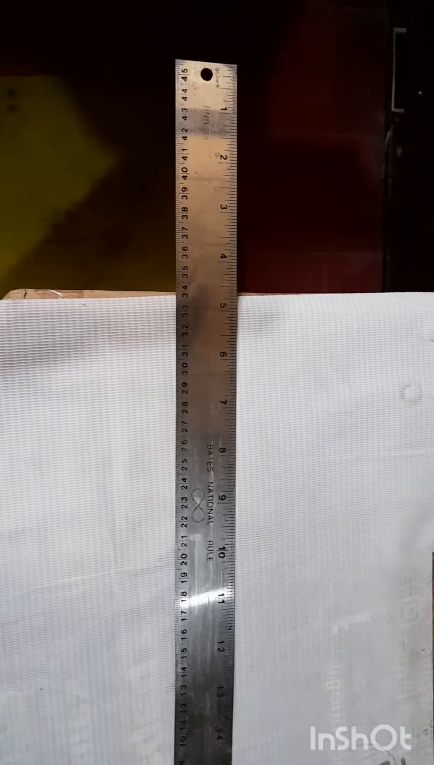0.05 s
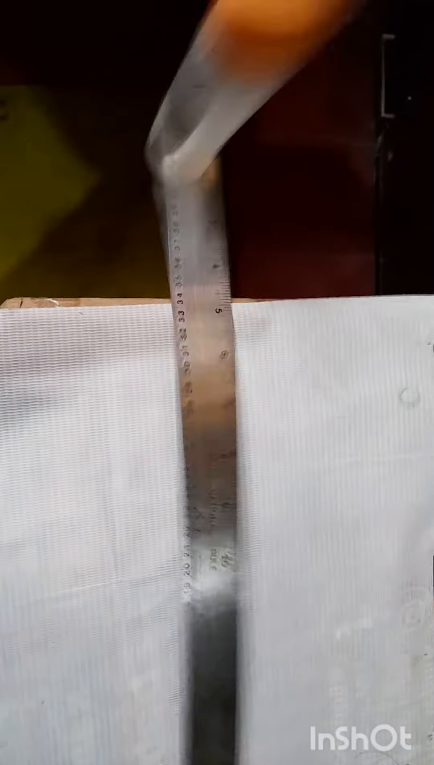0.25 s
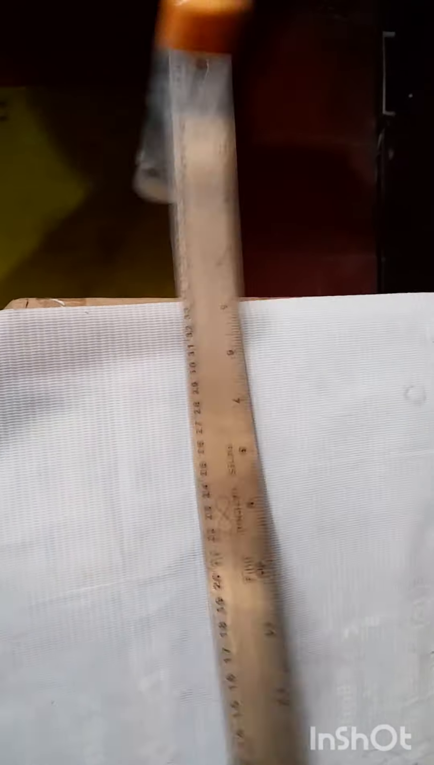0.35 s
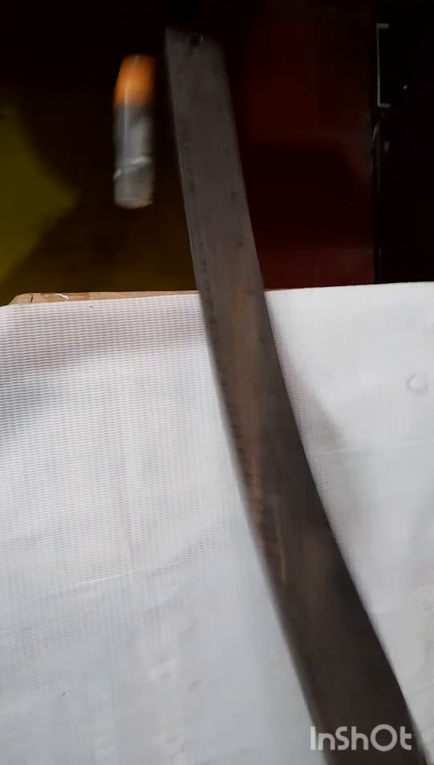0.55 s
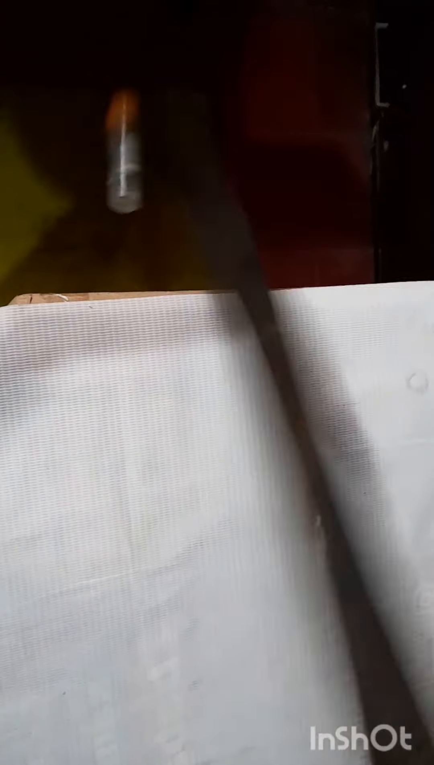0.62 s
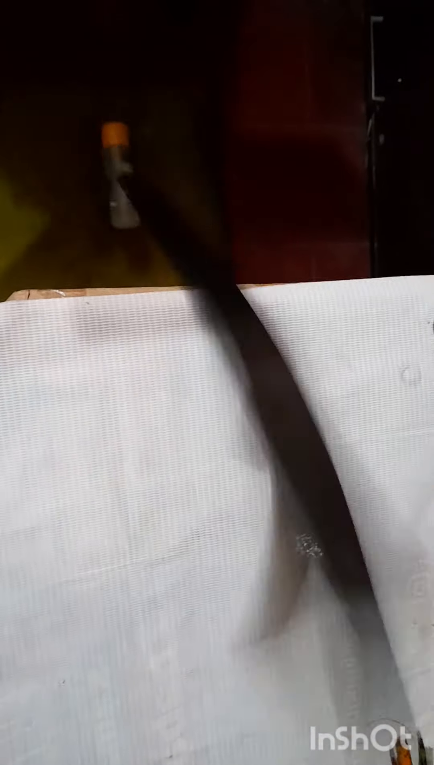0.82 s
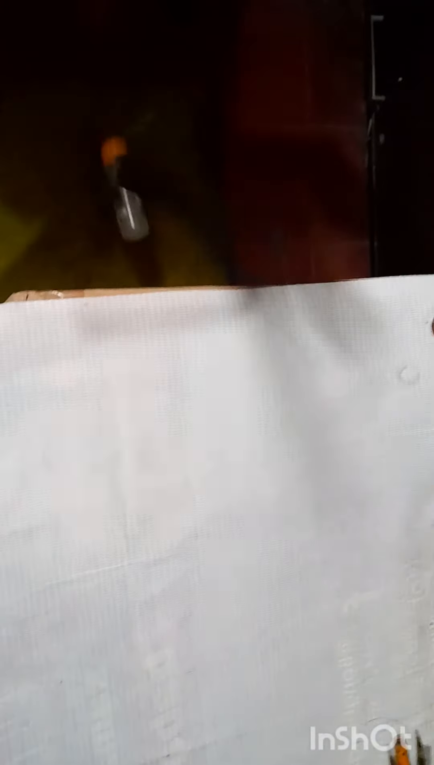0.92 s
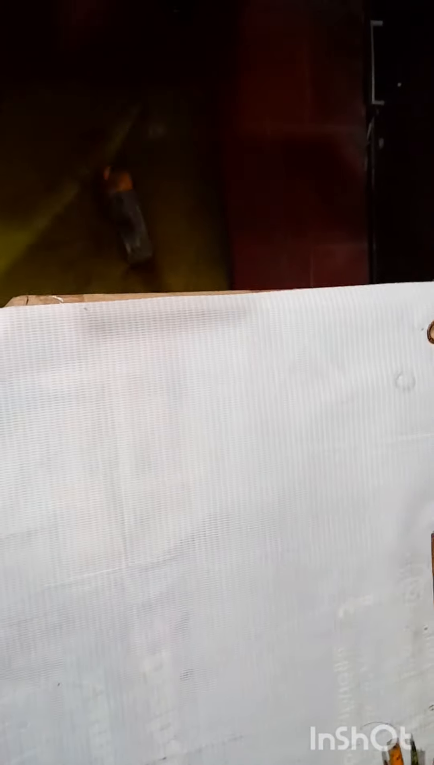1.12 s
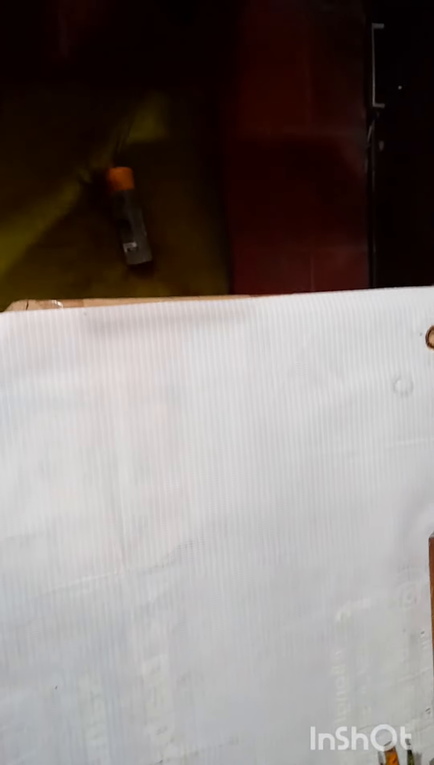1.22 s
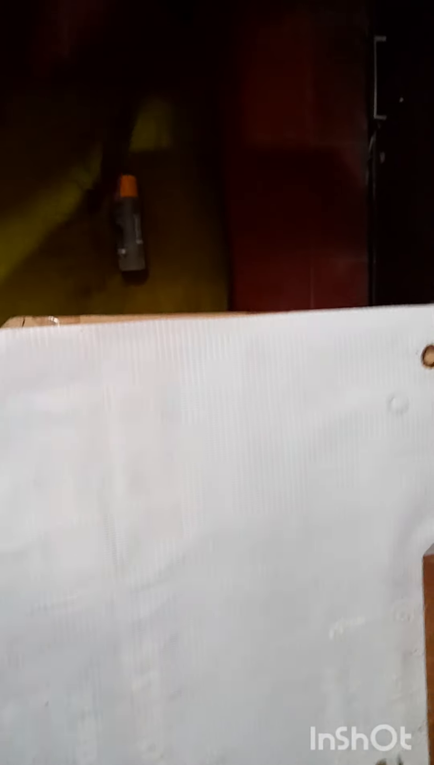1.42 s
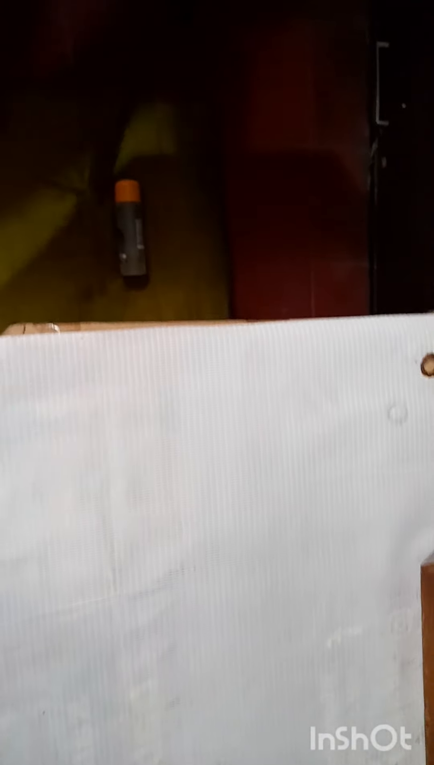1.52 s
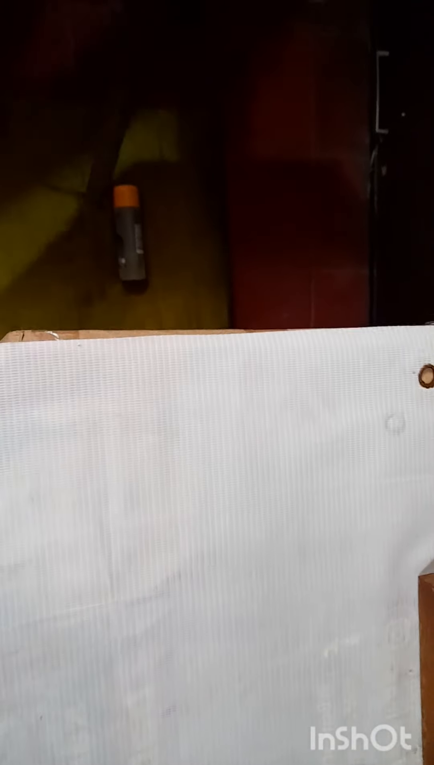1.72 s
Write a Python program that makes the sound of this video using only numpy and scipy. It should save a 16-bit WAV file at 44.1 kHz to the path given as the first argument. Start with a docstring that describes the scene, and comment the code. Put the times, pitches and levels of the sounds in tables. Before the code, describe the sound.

A steel ruler slaps a tabletop and buzzes briefly, then knocks against the microphone with a wavering ring. It clatters on the table edge, drops with two clacks and settles in a light rattle in a small room.

```python
"""A steel ruler overhanging a table, struck with a small tube, slaps the top, buzzes and flips.
It knocks against the microphone's case and rings, wavering as it bends, then clatters on the
table edge and drops off. Two clacks, dull bumps and a skittering rattle follow as things settle
on the floor of a small room. Hits are bursts of shaped noise plus the dying modes of what was hit."""
import sys
import numpy as np
from scipy import signal
from scipy.fft import rfft, irfft
from scipy.io import wavfile

SR = 44100
rng = np.random.default_rng(int(sys.argv[2]) if len(sys.argv) > 2 else 0)


def generate_wav(signal):
    """Clip the signal to [-1, 1] and save it as 16-bit WAV at the path in sys.argv[1]."""
    frames = np.transpose(np.atleast_2d(signal))
    scaled = np.clip(frames, -1, 1) * 32767
    pcm = np.round(scaled).astype(np.int16)
    wavfile.write(sys.argv[1], SR, pcm)


N = 77175
T = np.arange(N) / SR
TAIL = 16384  # longest ring or reverb, in samples


def amp(db):
    """Decibels to gain."""
    return 10 ** (np.asarray(db) / 20)


def curve_at(points, hz):
    """Reads a curve on a log-frequency axis."""
    freqs, values = np.transpose(points)
    return np.interp(np.log(hz + 1), np.log(freqs), values)


def unit_rms(x):
    """Scales to rms 1."""
    return x / np.sqrt(np.mean(x ** 2) + 1e-20)


def pan(left_db):
    """Left and right gains for a level difference."""
    return amp([[left_db / 2], [-left_db / 2]])


def fader(times_s, levels_db):
    """A level ride, silent outside its points."""
    return amp(np.interp(T, times_s, levels_db, -120, -120))


def burst(start_s, db, rise_s, decay_s):
    """Envelope with a linear attack and an exponential decay."""
    out = np.zeros(N)
    first = np.searchsorted(T, start_s)
    age = T[first:first + TAIL] - start_s
    attack = np.minimum(age / rise_s, 1)
    out[first:first + TAIL] = amp(db) * attack * np.exp(-np.maximum(age - rise_s, 0) / decay_s)
    return out


def convolve(x, response):
    """Filters one or two channels."""
    return signal.fftconvolve(np.atleast_2d(x), np.atleast_2d(response), axes=1)[:, :N]


def eq(x, points, left_db, size=2048):
    """Minimum-phase EQ of unit power; the treble leans to one side."""
    hz = np.fft.rfftfreq(size, 1 / SR)
    gain = amp(curve_at(points, hz)) * pan(left_db) ** (hz ** 2 / (hz ** 2 + 3000 ** 2))
    cepstrum = irfft(np.log(gain))
    cepstrum[:, 1:size // 2] *= 2
    cepstrum[:, size // 2 + 1:] = 0
    response = irfft(np.exp(rfft(cepstrum)))
    return convolve(x, response / np.sqrt(np.sum(response ** 2) / 2))


def resonate(x, hz, width_hz):
    """A resonance at a steady or gliding pitch."""
    carrier = np.exp(2j * np.pi * np.cumsum(hz * np.ones(N)) / SR)
    pole = np.exp(-np.pi * width_hz / SR)
    return (carrier * signal.lfilter([(1 - pole) ** 2], [1, -2 * pole, pole * pole], x / carrier)).real


# Likeness of left and right: freq_hz, correlation
STEREO_LIKENESS = [(50, 0.88), (250, 0.94), (600, 0.67), (1200, 0.13), (2500, 0.047), (15000, 0.1)]

def noise(size=N):
    """Stereo white noise, narrow in the bass and wide in the treble."""
    left, other = rfft(rng.standard_normal((2, size)))
    likeness = curve_at(STEREO_LIKENESS, np.fft.rfftfreq(size, 1 / SR))
    right = likeness * left + np.sqrt(1 - likeness ** 2) * other
    return irfft(np.array([left, right]), size)


def ring(hits, modes):
    """Dying modes set off by each hit (start_s, level_db); higher ones spread wider in stereo."""
    out = np.zeros((2, N + TAIL))
    for hz, mode_db, t60 in modes:
        age = T[:TAIL][T[:TAIL] < 1.2 * t60]
        envelope = amp(mode_db - 60 * age / t60) * (1 - np.exp(-age * hz))
        wave = envelope * np.exp(2j * np.pi * hz * age)
        phase_gap = np.arccos(curve_at(STEREO_LIKENESS, hz)) * rng.choice([-1, 1])
        stereo = np.array([wave, wave * np.exp(1j * phase_gap)])
        for count, (start, db) in enumerate(hits):
            first = round(start * SR)
            phase = 2 * np.pi * hz * start + count * np.pi / 2  # each hit adds in quadrature
            out[:, first:first + len(age)] += (amp(db) * np.exp(1j * phase) * stereo).imag
    return out[:, :N]


def impacts(hits, tone, modes, left_db):
    """Each hit is a burst of tiny contacts plus the ring of what was hit."""
    contacts = eq(noise() * sum(burst(*hit) for hit in hits), tone, left_db)
    return contacts + ring([hit[:2] for hit in hits], modes)


# Decay of the small room: freq_hz, t60_s
ROOM_DECAY = [(100, 0.53), (260, 0.31), (700, 0.34), (1840, 0.35), (4850, 0.3), (12800, 0.32)]

def room(x, wet_db, build_s=0.0022):
    """Adds a diffuse tail that builds up, then dies band by band."""
    hz, age, bands = signal.stft(noise(TAIL), SR, nperseg=256)
    decay = amp(-60 * age / curve_at(ROOM_DECAY, hz)[:, None])
    tail = signal.istft(bands * decay, SR, nperseg=256)[1][:, :TAIL]
    tail *= 1 - np.exp(-(T[:TAIL] / build_s) ** 2)
    return x + amp(wet_db) * convolve(x, tail / np.linalg.norm(tail[0]))


# Room tone: freq_hz, gain_db
AIR_EQ = [(30, -11), (110, -9), (165, 2.5), (215, -13.5), (275, 2), (400, -8), (800, -11.5), (2000, -13),
          (5700, -17.5), (15500, -21.5)]

def air():
    """A quiet, steady bed of air."""
    return amp(-52.5) * eq(noise(), AIR_EQ, left_db=-1)


# Slaps on the table top: start_s, level_db, rise_s, decay_s
SLAPS = [(.2095, -11.5, 0.0042, 0.0058), (.2302, -12, 0.00047, 0.0079), (.2437, -20, 0.0013, 0.01)]
# Tone of the smack: freq_hz, gain_db
SLAP_EQ = [(35, -50), (60, -42), (206, 1), (403, -5), (453, -11), (688, -4), (953, -25), (1170, -3.5),
           (1960, -9), (2530, -9), (4120, -3.5), (5320, -10), (6870, -4.5), (9080, -13), (12600, -12),
           (14500, -15.5), (15500, -35)]
# Table and ruler ringing together: pitch_hz, gain_db, t60_s
TABLE_MODES = [(221, -14.5, 0.14), (278, -22, 0.16), (645.4, -19.5, 0.41), (711, -16.5, 0.26),
               (826, -20, 0.31), (1052, -12.5, 0.19), (1167, -15, 0.19)]

def slaps():
    """The struck ruler slaps the table top and both ring."""
    return room(impacts(SLAPS, SLAP_EQ, TABLE_MODES, left_db=3.5), wet_db=-6.5, build_s=0.011)


# Course of the buzz: time_s, hum_db, zing_hz, zing_db
BUZZ_CURVE = [(.235, -35.5, 2520, -26.5), (.258, -23, 2900, -24), (.276, -19, 2980, -34),
              (0.292, -20.5, 3400, -29), (0.32, -23, 3260, -34), (.335, -26.5, 2886, -38.5),
              (0.355, -28.5, 2660, -46), (0.381, -30.5, 2670, -48)]
# Harmonics of the hum: harmonic_number, gain_db
HUM_HARMONICS = [(1, -26), (2, -4.5), (3, -3), (4, -18), (5, -22), (7, -29), (11, -19)]
# Flashes of a higher zing: start_s, level_db, rise_s, decay_s
UPPER_ZINGS = [(0.257, -19.5, .003, 0.0072), (0.27, -24, .004, 0.018)]

def buzz(beat_hz=88.33, beat_decay_cycles=0.79):
    """The ruler beats on the table: a hum, a rasp, and a zing that glides as the contact point shifts."""
    times, hum_db, zing_hz, zing_db = np.transpose(BUZZ_CURVE)
    cycles = beat_hz * (T - times[0])
    hum = sum(amp(db) * np.cos(2 * np.pi * (k * cycles + rng.random())) for k, db in HUM_HARMONICS)
    chatter = noise() * (0.47 + np.exp(-(cycles % 1) / beat_decay_cycles))
    rasp = amp(-14) * unit_rms(resonate(chatter, hz=510, width_hz=860))
    glide_hz = np.interp(T, times, zing_hz)
    tone = np.cos(2 * np.pi * np.cumsum(glide_hz) / SR + np.array([[0], [np.pi / 2]]))
    zing = unit_rms(tone + unit_rms(resonate(chatter, glide_hz, width_hz=320)))
    flashes = sum(burst(*row) for row in UPPER_ZINGS)
    upper_zing = unit_rms(resonate(chatter, hz=4000, width_hz=380)) * flashes
    treble = zing * fader(times, zing_db) + upper_zing
    return (hum + rasp) * fader(times, hum_db) + room(treble * pan(1.9), wet_db=-10)


# Level ride of the low end: time_s, level_db
RUMBLE_RIDE = [(.2, -71), (.26, -37), (.6, -58), (.66, -45.5), (.75, -47), (.92, -50.5), (1.05, -65.5),
               (1.2, -44), (1.3, -67)]
# Tone of the rumble: freq_hz, gain_db
RUMBLE_EQ = [(30, -13), (85, -1.5), (170, -1.5), (500, -11), (3000, -28)]

def rumble():
    """Low noise swells and ebbs under the hits."""
    return eq(noise(), RUMBLE_EQ, left_db=-4) * fader(*np.transpose(RUMBLE_RIDE))


def thump(start_s, db, push_s=0.00168, sway_hz=58, sway_s=0.028):
    """A knock through the case: one pull and push, then a slow sway."""
    age = np.maximum(T - start_s, 0)
    progress = age / push_s
    push = -2 * progress ** 2 * (1 - progress / 2) * np.exp(-progress ** 2 / 2.53)
    sway = 0.24 * np.sin(2 * np.pi * sway_hz * age) * np.exp(-age / sway_s)
    return amp(db) * (push + sway)


def flex(x, rate_hz=58, pitch_depth=0.011):
    """The ruler bends as it flies, so the pitch of its ring wavers."""
    bend = unit_rms(resonate(rng.standard_normal(N), rate_hz, width_hz=rate_hz))
    warped_s = T + pitch_depth * bend / (2 * np.pi * rate_hz)
    return np.array([np.interp(warped_s, T, channel) for channel in x])


# Knocks on the case: start_s, tick_db, thump_db, low_ring_db, mid_ring_db, high_ring_db, top_ring_db
KNOCKS = [(0.3883, -14.5, -13.5, -29.5, -21, -25, -40), (.407, -25, -22, -39, -25.5, -37, -31),
          (0.4251, -33, -35, -36, -46, -48, -37), (0.5367, -15.5, -12, -43, -58, -28.5, -11.5),
          (0.5546, -25.5, -12.5, -38.5, -65, -28.5, -14), (0.572, -63, -25.5, -55, -62, -47, -44),
          (0.6914, -15, -32, -39.5, -37, -37, -6), (0.7126, -28.5, -50, -43, -41, -40, -13)]
# The ruler's free ring, in low, mid, high and top groups: pitch_hz, gain_db, t60_s
RULER_MODES = [
    [(2583, -5, 0.38), (2703, -6, 0.16), (3050, -13, 0.18)],
    [(3520, -16, 0.19), (3940, -12, 0.074), (4150, -19.5, .15), (4980, -10.5, 0.05), (5910, 0, 0.056)],
    [(6940, -4, 0.07), (7230, -2.5, 0.08)],
    [(13660, -9, 0.028), (13100, -7, .025), (14300, -7.5, 0.034)],
]
# Tones of the tick and of the shimmer after it: freq_hz, gain_db
TICK_EQ = [(100, -9), (1000, -3), (2100, -5), (3000, 1.5), (5000, -9.5), (7300, 4), (8500, -3.5),
           (14000, 5.5), (16000, -2.5)]
SHIMMER_EQ = [(100, -27), (2200, -27), (2650, 6), (3500, -1.5), (5000, -10), (7200, -9), (8400, -10),
              (9600, -0.5), (14000, -3), (16000, -0.5)]

def knocks(tick_s=0.0011, lead_s=0.003, shimmer_s=0.053):
    """The flying ruler hits the case: a tick, ringing steel, and a thump on the right."""
    tick_level = sum(burst(start, db, 0.00027, tick_s) + burst(start - lead_s, db - 12, 0.0017, 0.0016)
                     for start, db, *_ in KNOCKS)
    shimmer_level = sum(burst(start, db - 18.5, 0.0025, shimmer_s) for start, db, *_ in KNOCKS)
    thumps = sum(thump(start, db) for start, _, db, *_ in KNOCKS)
    low, *upper = (ring([(start, ring_db[group]) for start, _, _, *ring_db in KNOCKS], modes)
                   for group, modes in enumerate(RULER_MODES))
    steel = (low + flex(sum(upper))) * pan(3.6)
    ticks = eq(noise() * tick_level, TICK_EQ, left_db=-3)
    airborne = room(ticks + steel, wet_db=-9)
    shimmer = eq(noise() * shimmer_level, SHIMMER_EQ, left_db=2.5)
    return airborne + shimmer + thumps * np.array([[0.03], [1]])


# Sliding scuffs: start_s, level_db, rise_s, decay_s
SCUFFS = [(.6458, -30.5, .0005, 0.0063), (.655, -38, .012, 0.016), (1.488, -32, .03, 0.039)]
# Tone of the rub: freq_hz, gain_db
SCUFF_EQ = [(100, -14), (210, 4), (400, 1.5), (650, 4), (1200, 1), (1900, -13.5), (9000, -32)]

def scuffs():
    """Brief slides give a dull rub with no ring."""
    return impacts(SCUFFS, SCUFF_EQ, modes=[], left_db=-3)


# Runs of metal chatter: start_s, length_s, level_db
SKITTERS = [(0.647, 0.039, -42), (0.924, 0.062, -46.5), (1.343, 0.046, -39), (1.385, 0.061, -35),
            (1.439, 0.051, -33), (1.496, 0.11, -50.5)]
# Sharp taps among them: start_s, level_db, rise_s, decay_s
TAPS = [(1.4442, -24.5, .0004, 0.0024), (1.451, -27, 0.00058, .003), (1.4608, -21.5, .0004, 0.0024),
        (1.4663, -24, 0.00088, 0.0036)]
# Tone of the chatter: freq_hz, gain_db
SKITTER_EQ = [(100, -25), (500, 0.5), (2200, -8.5), (2680, 9), (3600, -6), (4500, 2), (5600, -6),
              (7400, 0.5), (8500, -4.5), (10300, 2.5), (12800, -5.5), (14000, 1.5), (16000, -6)]

def skitter(clicks_per_s=3000, fade_s=0.0066, grain_s=0.0014):
    """Steel chatters and slides: dense tiny contacts and a few sharp taps keep the ruler ringing."""
    level = sum(amp(db) * np.clip(np.minimum(T - start, start + length - T) / fade_s + 0.5, 0, 1)
                for start, length, db in SKITTERS)
    clicks = (rng.random(N) < clicks_per_s / SR) * amp(np.minimum(rng.exponential(1, N), 3))
    grain = unit_rms(signal.lfilter([1], [1, -np.exp(-1 / (grain_s * SR))], clicks))
    contacts = noise() * (level * grain + sum(burst(*tap) for tap in TAPS))
    singing = amp(14) * resonate(contacts, hz=2620, width_hz=70)
    return eq(contacts, SKITTER_EQ, left_db=5) + room(singing, wet_db=1.5, build_s=0.022)


# Hits on the table edge: start_s, level_db, rise_s, decay_s
CLATTER = [(.7902, -23.5, 0.0015, 0.0053), (.8008, -17, 0.00035, 0.0036), (.816, -13.5, .0003, 0.0034),
           (.8315, -17, 0.00022, 0.003), (.843, -27, 0.0016, 0.0095)]
# Tone of their attack: freq_hz, gain_db
CLATTER_EQ = [(29, -42), (50, -12.5), (211, 0.5), (367, -13), (652, -4.5), (849, -13), (1080, -4),
              (1220, -8), (1410, -4.5), (1880, -9.5), (2620, -10.5), (3150, -9), (5000, -16), (7730, -22),
              (15500, -26.5)]
# Ring of ruler and edge: pitch_hz, gain_db, t60_s
EDGE_MODES = [(72, -26.5, .6), (199.2, -22, 0.07), (270.7, -15, 0.091), (539, -22, 0.11), (656, -13, 0.14),
              (1091, -20.5, 0.14), (1423, -26, 0.1), (1526, 1, 0.0084), (1640, -24, 0.069),
              (2612, -14.5, 0.31)]

def clatter(echo_s=0.0037, echo_db=-7.5):
    """The ruler clatters on the table edge, with one echo from a near surface."""
    direct = impacts(CLATTER, CLATTER_EQ, EDGE_MODES, left_db=4)
    echo = np.pad(direct, ((0, 0), (round(echo_s * SR), 0)))[:, :N]
    return room(direct + amp(echo_db) * echo, wet_db=-5.5)


# Modes of the overhang: pitch_hz, gain_db, t60_s
TWANG_MODES = [(167.7, -23, 0.18), (337, -32, 0.18), (1030, -37, 0.13)]

def twang(start_s=0.8475):
    """The overhang swings free with a short, low note."""
    return ring([(start_s, 0)], TWANG_MODES)


# Two clacks on the floor and an echo: start_s, level_db, rise_s, decay_s
CLACKS = [(1.1151, -16.5, 0.00066, 0.0038), (1.1347, -17.5, 0.00035, 0.0053), (1.1452, -29, 0.00065, 0.011)]
# Tone of their attack: freq_hz, gain_db
CLACK_EQ = [(80, -21.5), (280, -8.5), (600, -5), (1300, -12.5), (2000, -13.5), (2550, -6.5), (3200, -14.5),
            (3900, -7), (4250, -0.5), (4800, -8), (5700, -13), (6900, -16.5), (9200, -12), (14000, -16),
            (15600, -18.5)]
# Their ring: pitch_hz, gain_db, t60_s
CLACK_MODES = [(275, -10, 0.13), (500, -3.5, 0.02), (634, -22.5, 0.22), (989, -23.5, 0.23),
               (4200, -14, 0.12), (4470, -4, 0.01), (4650, -17, .035)]

def clacks():
    """Two hard hits on the floor, then a faint echo."""
    return room(impacts(CLACKS, CLACK_EQ, CLACK_MODES, left_db=4.5), wet_db=-4, build_s=0.02)


# Dull bumps: start_s, level_db, rise_s, decay_s
BUMPS = [(1.35, -33, 0.0016, 0.012), (1.372, -36.5, 0.0024, 0.036), (1.445, -41, 0.0021, 0.05)]
# Tone of their attack: freq_hz, gain_db
BUMP_EQ = [(60, -21), (140, -18), (220, 4), (370, 0.5), (550, 0), (1000, -8.5), (4000, -13), (9000, -32)]
# Their low ring: pitch_hz, gain_db, t60_s
BUMP_MODES = [(280, -9, .15), (452, -6.5, .35), (546, -9, 0.33)]

def bumps():
    """Things settle on the floor with soft, hollow bumps."""
    return impacts(BUMPS, BUMP_EQ, BUMP_MODES, left_db=-2)


def scene():
    """The ruler's trip from table to floor, over quiet air and a low rumble."""
    hits = slaps() + buzz() + knocks() + clatter() + twang() + clacks()
    small_contacts = room(bumps() + scuffs() + skitter(), wet_db=-7)
    return hits + small_contacts + rumble() + air()


def record(dry):
    """A steep high cut at 15850 Hz."""
    high_cut = signal.firwin(511, 15850, window=("kaiser", 9), fs=SR)
    return signal.oaconvolve(dry, high_cut[None], "same")


dry = scene()
out = record(dry)
generate_wav(out)
```